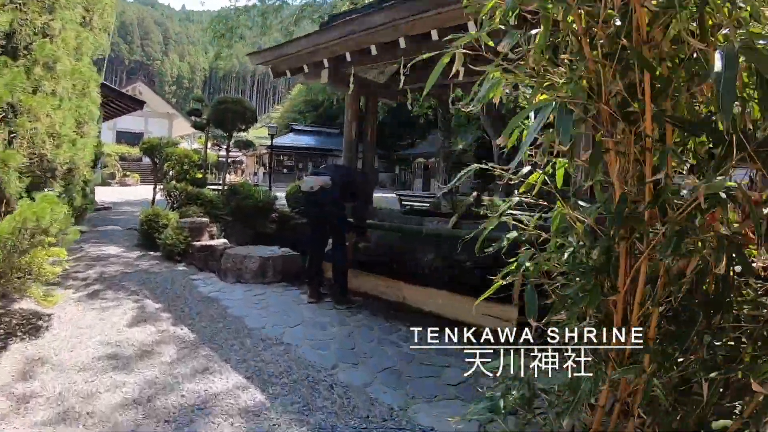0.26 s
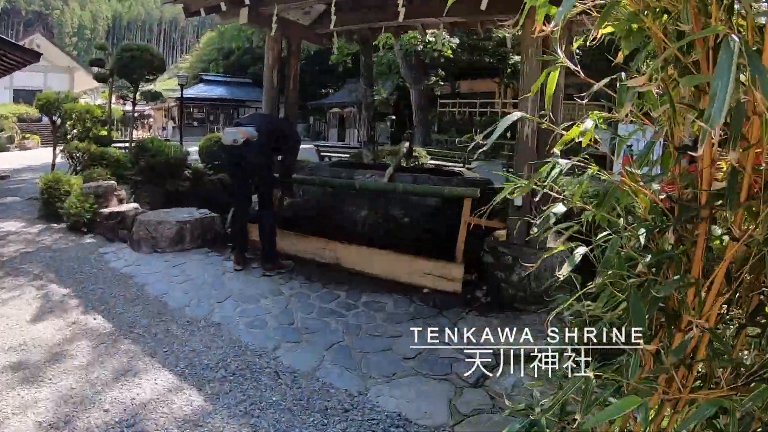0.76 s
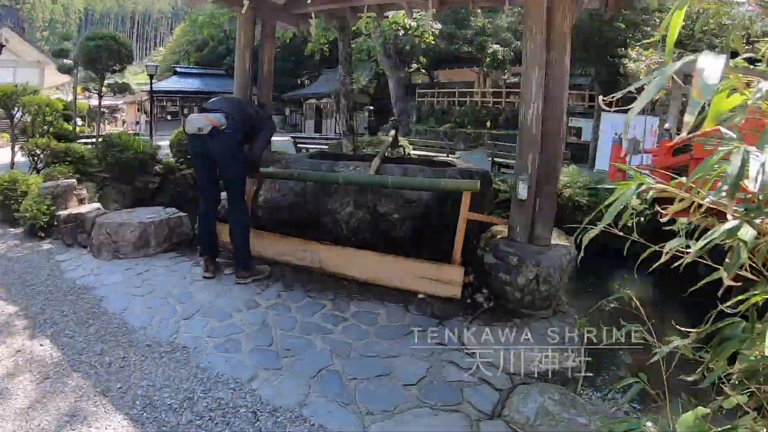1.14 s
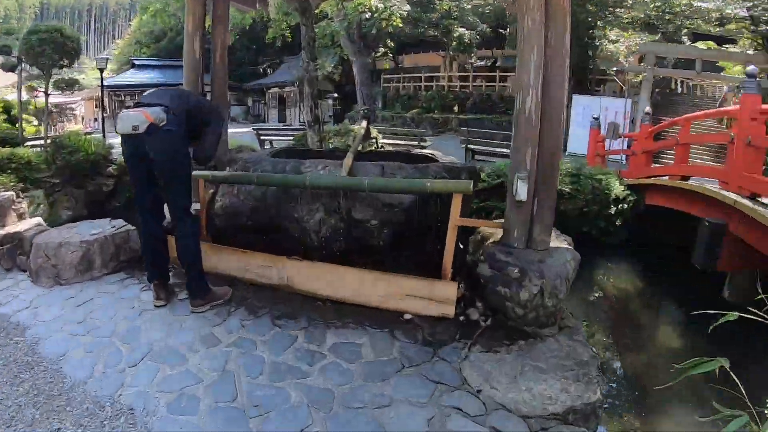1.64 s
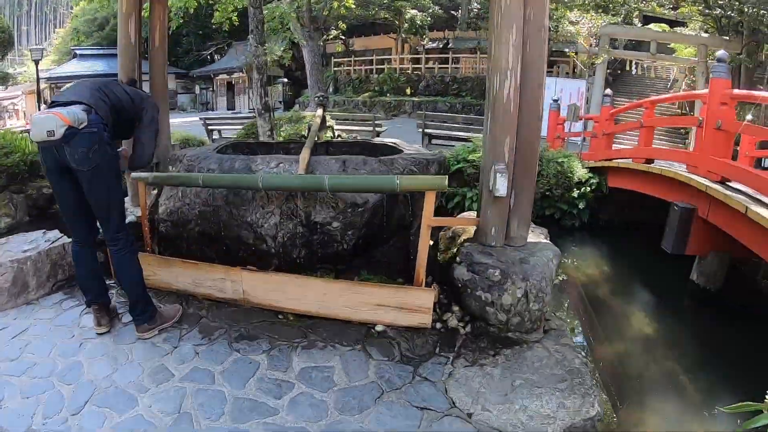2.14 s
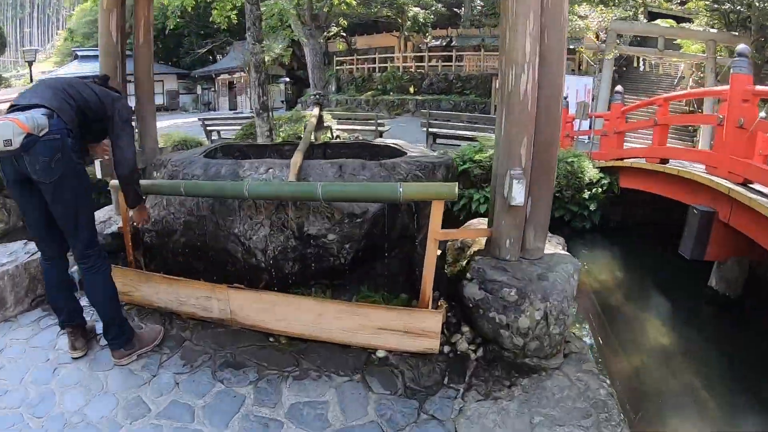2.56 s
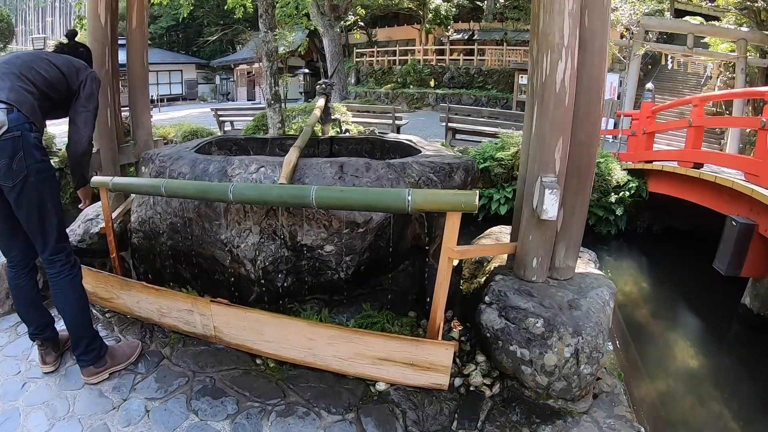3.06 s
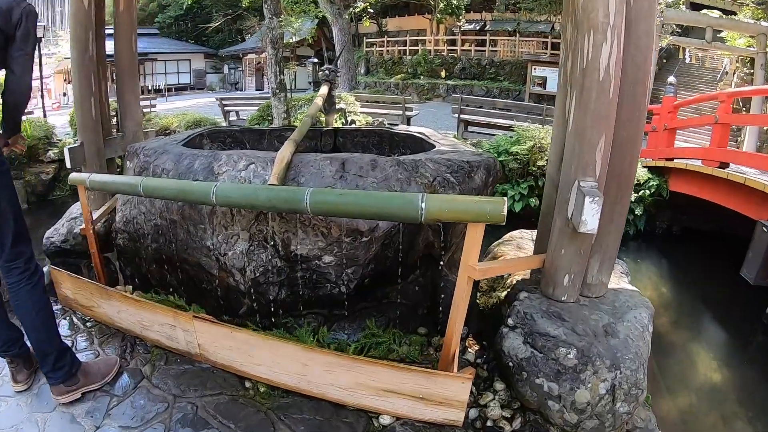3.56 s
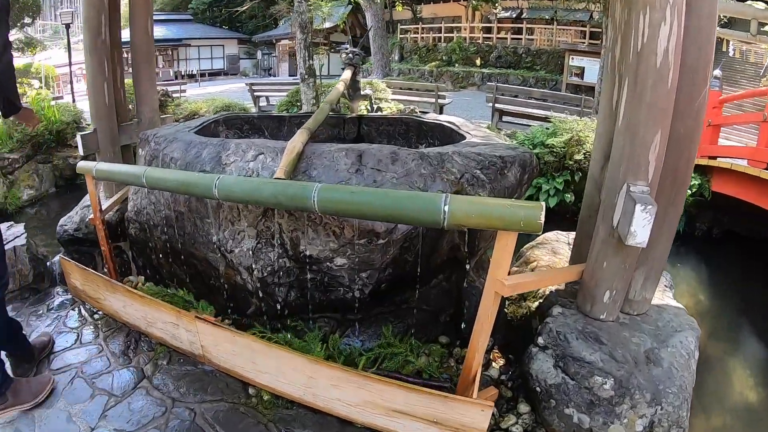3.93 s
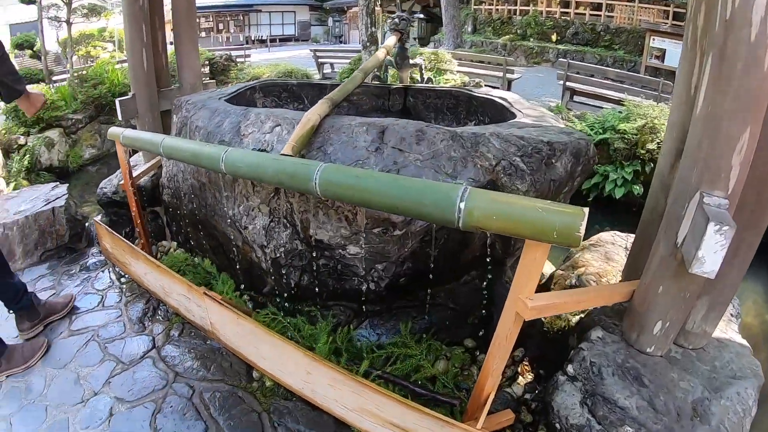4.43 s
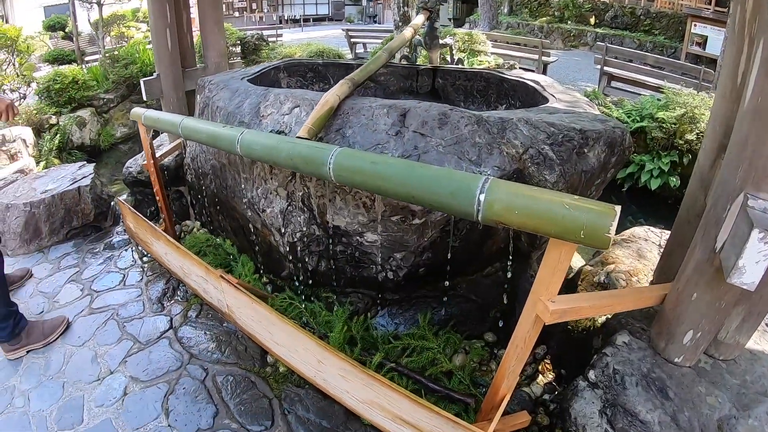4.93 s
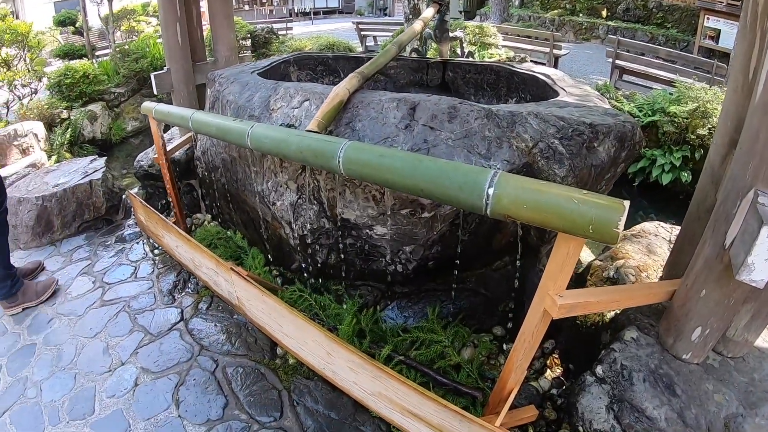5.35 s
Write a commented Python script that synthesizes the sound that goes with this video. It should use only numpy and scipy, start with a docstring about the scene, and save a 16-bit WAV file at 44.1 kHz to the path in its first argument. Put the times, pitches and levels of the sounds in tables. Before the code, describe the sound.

Footsteps on gravel and paving approach water trickling onto wet stones, with light wind buffeting the microphone.

```python
"""On a garden path, someone with a small camera walks over gravel and paving up to a stone basin.
Thin streams fall from a bamboo pipe and patter and splash on wet stones; trapped bubbles ring.
Shoes grind the gravel, slide on sand and scrape the slabs, and single pebbles click together.
A far bird calls faintly, and gusts buffet the two microphone openings (the ports)."""
import sys
import numpy as np
from scipy import signal
from scipy.fft import rfft, irfft, next_fast_len
from scipy.io import wavfile

SR = 44100
rng = np.random.default_rng(int(sys.argv[2]) if len(sys.argv) > 2 else 0)


def transcribe(u):
    """Save the signal u as a 16-bit wav file named by the first command-line argument.

    u: samples, shape (n,) or (channels, n), limited to [-1, 1]; the rate is SR.
    q: integer samples, one column per channel.
    """
    v = np.clip(np.atleast_2d(u).T, -1, 1)
    q = np.round(v * 32767).astype(np.int16)
    wavfile.write(sys.argv[1], SR, q)


N = 246519

# the falling water draws nearer: (time [s], patter level [dB], left over right [dB])
WATER_APPROACH = [(0.0, -56, -0.5), (0.5, -48.5, -4), (0.68, -52.5, 0), (2.91, -48, 1.5), (3.5, -51, 1),
                  (4.47, -45.5, 2), (5.59, -47, 1.5)]


def from_db(db):
    """Turn decibels into a gain to multiply by."""
    return 10 ** (np.asarray(db) / 20)


def unit_level(x):
    """Scale a sound so that its average strength (rms) is 1."""
    return x / np.sqrt(np.mean(x ** 2) + 1e-20)


def over_time(rows):
    """Join a table's points into curves with one value per sample."""
    times, *columns = np.transpose(rows)
    return [np.interp(np.arange(N) / SR, times, column) for column in columns]


def at_pitch(points, hz):
    """Read a table between its pitches, with octaves evenly spaced."""
    pitches, values = np.transpose(points)
    return np.interp(np.log(hz + 1), np.log(pitches + 1), values)


def pan(pan_db):
    """Left and right gains that average 1; above 0 dB the left is louder."""
    left, right = from_db(pan_db / 2), from_db(-pan_db / 2)
    return np.array([left, right]) * 2 / (left + right)


def band(x, low_hz, high_hz):
    """Keep the part of a sound between two pitches."""
    edges = np.clip([low_hz, high_hz], 10, .45 * SR)
    return signal.sosfilt(signal.butter(2, edges, "band", fs=SR, output="sos"), x)


def resonate(x, hz, width_hz):
    """Make a sound ring at one pitch; a narrower width rings longer."""
    r = np.exp(-np.pi * width_hz / SR)
    feedback = [1, -2 * r * np.cos(2 * np.pi * hz / SR), r * r]
    return signal.lfilter(np.array([1, 0, -1]) * (1 - r * r) / 2, feedback, x)


def drift(rate_hz):
    """A slow random wobble, about 1 in size."""
    r = np.exp(-80 * np.pi * rate_hz / SR)
    slow = signal.lfilter([1], [1, -2 * r, r * r], rng.standard_normal(N // 40 + 2002))[2000:]
    return np.interp(np.arange(N) / 40, np.arange(len(slow)), unit_level(slow))


def add(out, time_s, sound):
    """Mix a sound in at the given time."""
    start = max(round(time_s * SR), 0)
    out[:, start:start + sound.shape[1]] += sound[:, :N - start]


def grains(per_s, spread_db):
    """Two separate streams of tiny random hits, very uneven in size."""
    sizes = from_db(spread_db * np.minimum(rng.exponential(1, (2, N)), 5)) * rng.choice([-1, 1], (2, N))
    return sizes * (rng.random((2, N)) < per_s / SR)


def stereo(pair, hz):
    """Blend two streams into a left and a right that are partly alike."""
    # how alike the two ports sound: (pitch [Hz], likeness [0 to 1])
    likeness = [(60, 0), (180, 0.91), (550, 0.86), (1650, 0.49), (4000, 0.59), (7000, 0.46), (15000, .3)]
    alike = at_pitch(likeness, hz)
    return np.sqrt(1 + alike) * pair[0] + np.sqrt(1 - alike) * pair[1] * [[1], [-1]]


def swells(time_s, peak_db, rise_s, fall_s):
    """Gain of events that swell and fade; rise and fall are seconds per 20 dB, held to 2 ms or more."""
    since_peak = np.arange(N) / SR - np.reshape(time_s, (-1, 1))
    rise = np.maximum(np.reshape(rise_s, (-1, 1)), .002)
    fall = np.maximum(np.reshape(fall_s, (-1, 1)), .002)
    level_db = np.reshape(peak_db, (-1, 1)) - 20 * since_peak / np.where(since_peak < 0, -rise, fall)
    return np.sqrt(np.sum(from_db(2 * level_db), axis=0))


def water_patter(flicker_db, burst_db):
    """Countless droplets hit stone; each band of pitch flickers and has sudden small sprays."""
    # tone of the patter: (pitch [Hz], relative level [dB])
    patter_tone = [(71, -42), (120, -52), (177, 6.5), (468, -39.5), (1080, -2.5), (1790, -6.5),
                   (2150, -1.5), (2430, -2), (4030, -7), (6970, -4), (9850, -3), (12300, -19.5),
                   (13600, -27), (15400, -63)]
    out, edges_hz = 0, 140 * 2 ** np.arange(0, 7.1, .5)
    drops = [grains(9000, 4.34), grains(9000, 4.5)]
    for k, (low, high) in enumerate(zip(edges_hz, edges_hz[1:])):
        hz = np.sqrt(low * high)
        sprays = signal.lfilter([1], [1, -np.exp(-1 / (0.016 * SR))], np.abs(grains(18, 2.4)[0]))
        gain = from_db(at_pitch(patter_tone, hz) + flicker_db * drift(17))
        gain *= 1 + from_db(burst_db) * sprays
        out = out + gain * stereo(band(drops[k % 2], low, high), hz)
    return from_db(over_time(WATER_APPROACH)[0]) * unit_level(out)


def droplet_bubbles(per_s, sharpness, level_db):
    """Small drops each trap a bubble that rings briefly; smaller ones ring higher."""
    drops, pitch_slot, out = grains(per_s, 2.8), rng.integers(0, 24, (2, N)), 0
    for k, hz in enumerate(np.geomspace(900, 7000, 24)):
        ring = resonate(drops * (pitch_slot == k) + 1e-18, hz, hz / sharpness)
        out = out + hz ** 0.22 * stereo(ring, hz)
    return from_db(over_time(WATER_APPROACH)[0] + level_db) * unit_level(out)


def wind_rumble():
    """Swirls of air hit each port at random and make a lumpy, low rumble."""
    # gusts: (peak time [s], level [dB], fall [s per 20 dB])
    gusts = [(.005, -53, 0.1), (.28, -56, 3), (.66, -41, 0.06), (.78, -42, 0.1), (.94, -51.5, -0.2),
             (1.23, -48.5, .18), (1.56, -51, 0.6), (1.88, -39.5, 0.16), (2.71, -45, 0.13), (3.03, -63, 0.2),
             (3.57, -39.5, 0.08), (4.22, -44, 0.8), (4.42, -42, -0.04), (5.4, -47.5, .06)]
    rise_s, breeze_db = 0.1, -86
    swirls = band(band(grains(90, 3.0), 16, 64), 12, 95)
    time_s, level_db, fall_s = np.transpose(gusts)
    return (swells(time_s, level_db, rise_s, fall_s) + from_db(breeze_db)) * unit_level(swirls)


def knock(hz, cycles):
    """Stone meets stone: the ring swells, then dies within a few swings."""
    phase = np.arange(int(8 * cycles / hz * SR)) / SR * hz / cycles
    ring = phase * phase * np.exp(-2 * phase) * np.sin(2 * np.pi * cycles * phase)
    return ring / np.abs(ring).max()


def footfalls(rows):
    """Gains over time for a shoe's rubbing and for the thud under it."""
    time_s, level_db, rise_s, fall_s, thud_db = np.transpose(rows)
    return swells(time_s, level_db, rise_s, fall_s), swells(time_s, level_db + thud_db, rise_s, fall_s)


def sole_thud(gain):
    """The dull bump of a sole taking weight."""
    bump = band(band(grains(900, 3.0), 125, 420), 110, 750)
    return gain * unit_level(stereo(bump, 160))


def gravel_steps():
    """Stones grind under a shoe as a crowd of short knocks, and the sole thuds."""
    # crunches of heel, sole or toe:
    # (peak time [s], level [dB], rise [s per 20 dB], fall [s per 20 dB], thud over crunch [dB])
    crunches = [(.005, -44, -1.5, 0.12, -10.5), (.22, -48, 0.25, -0.23, -27.5),
                (.314, -37.5, -0.0552, 0.31, -4.5), (.49, -31.5, 0.22, 0.14, -10),
                (.585, -37.5, 0.2, 0.05, -5.5), (.95, -49, -0.12, 2.7, -17.5),
                (1.03, -41, -0.24, 0.5, -6.5), (1.1, -39, 0, 0.12, -1.5), (1.133, -30, 0, 0.06, -12.5),
                (1.155, -31, 0.0148, -0.1349, -20), (1.23, -43, 0.5, 0.15, -13), (1.5, -52, -0.1, .2, -12),
                (1.64, -38.5, -0.03, 0.08, -16), (1.777, -37.5, 0.02, 0.1156, 2),
                (1.82, -34.5, .1, 0.04, -16), (1.91, -36, 0.18, 0.13, -9), (2.03, -54.5, 1, 0.5, -7.5),
                (2.545, -54, 0.2, 2.5, -18), (2.63, -35, 0.0958, 0.37, -6), (2.74, -41, 0.16, -0.04, -5),
                (2.92, -45.5, 0.5, 0.3, -7.5), (3.293, -40, 0.01, 0.04, -4), (3.385, -37, 0.2, 0.16, -18),
                (3.435, -34.5, 0.09, 0.13, -7)]
    # tone of the knocks, before a tilt toward the highs: (pitch [Hz], relative level [dB])
    gravel_tone = [(380, -11), (585, -1.5), (902, 5), (978, -2), (1600, 2.5), (4260, -18.5), (5000, -18),
                   (6500, -49), (11000, -120)]
    stir_db, gravel_ends_s, light_step_db = -61, 3.5, -48
    grind, weight = footfalls(crunches)
    stir = from_db(stir_db) * (np.arange(N) < gravel_ends_s * SR)  # loose stones keep shifting
    grind = np.hypot(grind, stir)
    hits, pitch_slot = grains(3200 * from_db(2.5 * drift(60)), 2.8), rng.integers(0, 12, (2, N))
    crunch = 0
    for k, hz in enumerate(np.geomspace(380, 4500, 12)):
        knocks = signal.oaconvolve(hits * (pitch_slot == k), knock(hz, cycles=1.34)[None], axes=1)
        gain = from_db(at_pitch(gravel_tone, hz)) * np.sqrt(hz)
        crunch = crunch + gain * stereo(unit_level(knocks[:, :N]), hz)
    # under a light step only the top stones click, in a narrow band
    top_stones = unit_level(band(crunch, 950, 1750))
    heavy = grind ** 2 / (grind ** 2 + from_db(2 * light_step_db))
    crunch = np.sqrt(heavy) * unit_level(crunch) + np.sqrt(1 - heavy) * top_stones
    return grind * unit_level(crunch) * pan(-5)[:, None] + sole_thud(weight)


def splashes(width_ratio):
    """A drop bursts on stone: a slap, a grainy spray, and the plink of trapped bubbles."""
    # single splashes: (time [s], rough peak level [dB], centre pitch [Hz], time to fade 60 dB [s])
    drops = [(0.0352, -41, 4650, 0.074), (0.0914, -39, 3880, 0.066), (0.118, -39, 6440, 0.13),
             (0.151, -35, 4740, 0.025), (0.2109, -35.5, 6000, 0.039), (0.762, -34.5, 7330, 0.11),
             (0.794, -37, 6350, 0.1), (0.8591, -35.5, 5570, 0.056), (0.944, -36, 5840, 0.082),
             (0.9578, -39, 6450, 0.054), (1.0303, -35.5, 6600, 0.065), (1.2138, -39, 2780, 0.06),
             (1.363, -33.5, 3540, 0.054), (1.44, -33.5, 4300, 0.082), (1.781, -30, 2400, 0.068),
             (1.949, -39, 6500, 0.049), (2.079, -35.5, 6760, 0.037), (2.1154, -34.5, 2430, 0.063),
             (2.1238, -30, 8700, 0.058), (2.138, -29.5, 3230, 0.09), (2.16, -35, 3460, 0.093),
             (2.1884, -38.5, 5170, 0.086), (2.2467, -34, 6100, 0.023), (2.286, -37, 3230, 0.032),
             (2.3995, -36.5, 5560, 0.027), (2.4438, -31, 4800, 0.026), (2.505, -36, 5030, 0.1),
             (2.7134, -36, 2960, 0.21), (2.8752, -39, 3100, 0.14), (2.96, -29.5, 5840, 0.048),
             (2.9906, -34, 3020, 0.094), (3.104, -37.5, 2510, 0.043), (3.15, -32.5, 5070, 0.1),
             (3.226, -38, 2440, 0.064), (3.6564, -38.5, 3840, 0.1), (3.7396, -40.5, 5630, 0.065),
             (3.786, -36, 6740, 0.13), (3.823, -37.5, 2950, 0.058), (3.856, -38, 4540, 0.061),
             (3.9381, -40, 4970, 0.046), (3.9754, -36, 2740, 0.15), (4.016, -34.5, 3020, 0.12),
             (4.058, -29, 5560, 0.062), (4.067, -30.5, 5740, 0.099), (4.094, -40.5, 3000, 0.2),
             (4.284, -38.5, 4600, 0.056), (4.4043, -34, 2600, 0.047), (4.444, -39, 4080, 0.069),
             (4.469, -34.5, 2720, 0.046), (4.5207, -43, 3960, .05), (4.6018, -30.5, 3800, 0.11),
             (4.653, -34, 3200, 0.079), (4.685, -31.5, 2400, 0.056), (4.7535, -31, 2640, 0.041),
             (4.7812, -38, 7700, 0.07), (4.8086, -41, 5000, 0.045), (4.845, -37, 2280, .06),
             (4.936, -32.5, 2660, 0.081), (5.082, -33.5, 2760, 0.18), (5.128, -36, 4940, 0.052),
             (5.1703, -37, 2750, 0.065), (5.206, -36.5, 3700, 0.094), (5.2728, -31.5, 6730, 0.078),
             (5.3615, -28, 3050, 0.066), (5.438, -37.5, 5200, 0.12), (5.4854, -26.5, 2300, 0.12),
             (5.5488, -31.5, 2850, 0.061)]
    slap_db, slap_s, peak_over_average_db = -7, 0.0039, 13
    out, t = np.zeros((2, N)), np.arange(int(.2 * SR)) / SR
    bubble_detunes = rng.normal(0, 0.295, (len(drops), 3))
    for (time_s, peak_db, hz, fade_s), detunes in zip(drops, bubble_detunes):
        noise = rng.standard_normal((2, len(t)))
        noise *= from_db(0.33 * rng.standard_normal(len(t) // 40 + 1).repeat(40)[:len(t)])
        spray = unit_level(band(noise, hz / width_ratio, hz * width_ratio))
        spray += 0.85 * unit_level(band(noise, 2300, 7300))
        spray += 0.21 * unit_level(band(noise, 6300, 10700))
        plinks = 0.53 * resonate(noise, hz, 125)
        plinks += sum(resonate(noise, hz * np.exp(detune), 52) for detune in detunes)
        onset = 1 - np.exp(-t / 0.00035)
        fade = 0.79 * from_db(-60 * t / fade_s) + from_db(slap_db) * np.exp(-t / slap_s)
        splash = onset * fade * stereo(spray + unit_level(plinks), hz)
        add(out, time_s, from_db(peak_db - peak_over_average_db) * splash)
    return out


def pebble_clicks():
    """Two pebbles knock together with a short ring, a bright tick and two quick echoes."""
    # knocks: (time [s], level [dB], pitch [Hz])
    clicks = [(0.05, -31.5, 1120), (0.133, -34, 1560), (0.182, -36, 1470), (0.316, -29, 950),
              (0.415, -27, 1910), (0.448, -31, 910), (0.472, -26.5, 605), (0.486, -17, 1900),
              (0.525, -18.5, 1590), (0.554, -25, 1840), (0.879, -32, 1100), (1.015, -27.5, 950),
              (1.039, -36, 1260), (1.083, -33.5, 1070), (1.11, -34, 1260), (1.129, -27, 1140),
              (1.135, -25, 1170), (1.141, -21, 1150), (1.147, -21.5, 1170), (1.151, -19.5, 1530),
              (1.157, -30, 1170), (1.212, -29, 1310), (1.198, -27.5, 1440), (1.243, -30, 1200),
              (1.28, -24.5, 1340), (1.286, -22, 1500), (1.289, -17, 1500), (1.296, -24, 1380),
              (1.342, -27, 1520), (1.357, -32, 1520), (1.381, -37, 1460), (1.407, -30.5, 1340),
              (1.485, -28.5, 1370), (1.534, -24, 1440), (1.599, -35, 1370), (1.6169, -13.5, 1770),
              (1.623, -23, 1310), (1.626, -14, 1540), (1.637, -24, 1230), (1.6453, -19, 1440),
              (1.6471, -15, 1870), (1.664, -31.5, 1290), (1.677, -17.5, 1750), (1.701, -19.5, 1690),
              (1.75, -27.5, 1760), (1.766, -25, 1500), (1.783, -30, 1930), (1.797, -11, 1660),
              (1.843, -24, 1510), (1.865, -23.5, 1750), (1.874, -27, 1820), (1.918, -26, 1220),
              (1.922, -26, 1430), (2.353, -23, 1320), (2.367, -28.5, 1230), (2.478, -22, 1430),
              (2.568, -27.5, 1390), (2.604, -30, 1480), (2.615, -28, 690), (2.622, -26, 920),
              (2.625, -27, 910), (2.64, -31, 810), (2.653, -29, 1110), (2.695, -37, 1050),
              (2.717, -26, 1170), (2.832, -29, 1080), (2.908, -18.5, 1140), (2.981, -32.5, 1090),
              (3.016, -32.5, 1100), (3.044, -24.5, 1130), (3.077, -29.5, 1260), (3.148, -29.5, 1440),
              (3.289, -33, 640), (3.308, -27, 1270), (3.339, -36, 1490), (3.36, -29, 1610),
              (3.381, -21.5, 1610), (3.396, -25, 1600), (3.413, -24.5, 1290), (3.421, -31.5, 505),
              (3.461, -27, 1300)]
    # echoes off the ground and posts: (delay [s], relative level [dB])
    bounces = [(.0022, -22), (.0097, -13)]
    direct, echoes = np.zeros((2, N)), np.zeros((2, N))
    for time_s, level_db, hz in clicks:
        add(direct, time_s - .0003, -from_db(level_db) * knock(hz, cycles=0.93)[None])
        add(direct, time_s, from_db(level_db - 17.5) * knock(hz * 2.36, cycles=0.8)[None])  # the tick
    direct *= pan(-10)[:, None]
    for delay_s, echo_db in bounces:
        add(echoes, delay_s, from_db(echo_db) * direct[::-1])  # left and right swap
    return direct + echoes


def sand_scuffs():
    """Fine sand hisses brightly while a sole slides over it."""
    # slides: (peak time [s], level [dB], rise [s per 20 dB], fall [s per 20 dB])
    slides = [(0.316, -38.5, -2.05, 0.37), (.49, -33, -0.5, -0.05), (1.132, -44.5, 0.04, 0.18),
              (2.577, -45.5, -0.2251, 0.33), (3.418, -39, 0.07, 0.15)]
    return swells(*np.transpose(slides)) * unit_level(band(grains(8000, 3.3), 1670, 10100))


def wind_thumps():
    """A gust makes the pressure jump at a port: a crack, then swings that get ever slower."""
    # thumps: (time [s], level [dB], slowing time [s], starting rate [swings per slowing time],
    # fade [s], crack over swing [dB], left over right [dB])
    thumps = [(0.559, -30, 0.021, 1.4, 0.018, -45, 5), (1.447, -37, 0.019, 3.7, .009, -43, -23),
              (2.6812, -36.5, 0.0089, 2, 0.0065, -38.5, -32), (2.739, -34, .015, 1.7, .01, -38, -1),
              (3.5315, -31.5, 0.0042, 1.37, 0.0093, -35, -25), (4.507, -36.5, 0.016, 1.5, .03, -43, -10),
              (4.579, -29.5, 0.0145, 1.65, .04, -43, -12), (5.3913, -16.5, 0.0033, 1.07, 0.007, -1.5, -21),
              (5.397, -29.5, 0.033, 1.6, 0.018, -46.5, -22), (5.433, -38, .004, 1.4, .004, -30, 0)]
    out, t = np.zeros((2, N)), np.arange(int(.12 * SR)) / SR
    for time_s, level_db, slowing_s, rate, fade_s, crack_db, pan_db in thumps:
        swing = np.cos(2 * np.pi * rate * np.log1p(t / slowing_s)) * np.exp(-(t / fade_s) ** 2)
        onset = 1 - np.exp(-t / (0.027 * slowing_s))
        crack = from_db(crack_db) * band(rng.standard_normal(len(t)) * np.exp(-t / 0.00057), 2000, 7500)
        add(out, time_s, from_db(level_db) * pan(pan_db)[:, None] * (onset * swing + crack))
    return out


def far_bird():
    """A bird gives faint, slightly hoarse whistles that bend up a little."""
    # calls: (time [s], length [s], pitch [Hz], level [dB])
    calls = [(1.873, 0.05, 4350, -54.5), (2.03, 0.04, 4460, -62.5), (3.507, .095, 4500, -60.5)]
    bend, hoarseness = .015, .3  # bend: share the pitch climbs over a call
    out = np.zeros((2, N))
    for time_s, length_s, hz, level_db in calls:
        t = np.arange(int(length_s * SR)) / SR
        rasp = 1 + hoarseness * unit_level(band(rng.standard_normal(len(t)), 20, 120))
        tone = np.sin(2 * np.pi * hz * (t + bend * t * t / length_s / 2))
        arch = np.sqrt(2 * np.sin(np.pi * t / length_s))
        add(out, time_s, from_db(level_db) * (arch * tone * rasp)[None])
    return out


def paving_steps():
    """Soft soles rub grit on the slabs, and now one hollow note rings, now another."""
    # touches of a sole:
    # (peak time [s], level [dB], rise [s per 20 dB], fall [s per 20 dB], thud over scrape [dB])
    touches = [(3.525, -44.5, .06, 0.11, 2), (3.66, -48.5, 0.13, 0.36, -7.5), (3.92, -60, 0.13, 0.23, -22),
               (4.035, -48, 0.017, 0.066, 7), (4.182, -37.5, 0.055, 0.11, -3.5),
               (4.36, -42.5, 0.24, 0.12, -9), (4.57, -50, 0.21, 0.21, -2.5),
               (4.66, -50.5, 0.058, 0.065, -15), (4.79, -55.5, 0.2, 0.12, -22),
               (4.893, -46, 0.0089, .1, -3.5), (4.915, -40, 0.026, 0.14, -5), (5.05, -41.5, 0.05, 0.14, -8),
               (5.2, -54.5, 0.33, 0.46, -8), (5.435, -43.5, 0.0097, 0.026, 3),
               (5.55, -52, 0.095, 0.044, -22)]
    # hollow notes of the scrape: (pitch [Hz], width [Hz], relative level [dB])
    slab_notes = [(757, 44, -6.5), (883, 71, -5.5), (1072, 56, -9), (1270, 130, -15.5), (1792, 60, -7.5)]
    scrape, weight = footfalls(touches)
    rub, ring = grains(4000, 3.0), 0
    for k, (hz, width_hz, level_db) in enumerate(slab_notes):
        gain = from_db(level_db + 2.5 * drift(12.0)) * (-1) ** k
        ring = ring + gain * stereo(resonate(rub, hz, width_hz), hz)
    grit = 0.64 * unit_level(band(rub, 555, 1170))
    return scrape * (unit_level(ring) + grit) * pan(0.5)[:, None] + sole_thud(weight)


def plops():
    """A fat drop in pooled water traps a big bubble that rings low and climbs in pitch."""
    # fat drops: (time [s], level [dB], starting pitch [Hz])
    drops = [(4.655, -37.5, 1136), (4.781, -36, 1040), (5.048, -30, 1057), (5.312, -43, 1100),
             (5.503, -39, 1500), (5.547, -38, 950)]
    fade_s, climb_per_s, roughness = 0.047, 7.7, 0.36
    out, t = np.zeros((2, N)), np.arange(int(.06 * SR)) / SR
    shape = from_db(-60 * t / fade_s) * (1 - np.exp(-t / 0.0014))
    for time_s, level_db, hz in drops:
        tone = np.sin(2 * np.pi * hz * t * (1 + climb_per_s * t / 2))
        flutter = 1 + roughness * unit_level(band(rng.standard_normal(len(t)), 30, 400))
        add(out, time_s, (from_db(level_db) * shape * tone * flutter)[None])
    return out


def reach_ports(x, low_cut_hz):
    """Sound bends round the camera and reaches the two ports out of step, its deep bass cut."""
    # how far the left port runs ahead: (pitch [Hz], lead [radians])
    left_lead = [(0, 0), (600, -.3), (1720, 1.5), (2410, .5), (3190, .8), (4000, .2), (6500, 1.1),
                 (7500, 1.9), (15000, 1.7)]
    size = next_fast_len(N)
    lead = at_pitch(left_lead, np.arange(size // 2 + 1) * SR / size)
    phase_shift = np.exp(.5j * lead * [[1], [-1]])
    thinned = signal.sosfilt(signal.butter(4, low_cut_hz, "high", fs=SR, output="sos"), x)
    return irfft(rfft(thinned, size) * phase_shift, size)[:, :N]


def scene():
    """Water, feet and bird arrive from around the camera; the wind hits the ports directly."""
    water = water_patter(flicker_db=1.0, burst_db=-5) + plops() + splashes(width_ratio=1.38)
    water += droplet_bubbles(per_s=280, sharpness=45, level_db=-10)
    water *= pan(over_time(WATER_APPROACH)[1])
    feet = gravel_steps() + sand_scuffs() + paving_steps() + pebble_clicks()
    return reach_ports(water + feet + far_bird(), low_cut_hz=125) + wind_rumble() + wind_thumps()


def record(dry):
    """The microphone dulls the highest sounds, then the very top is cut steeply."""
    dull_hz, cutoff_hz = 13500, 15600
    dulled = signal.sosfilt(signal.butter(6, dull_hz, fs=SR, output="sos"), dry)
    return signal.sosfilt(signal.cheby2(12, 70, cutoff_hz, fs=SR, output="sos"), dulled)


dry = scene()
out = record(dry)
transcribe(out)
```